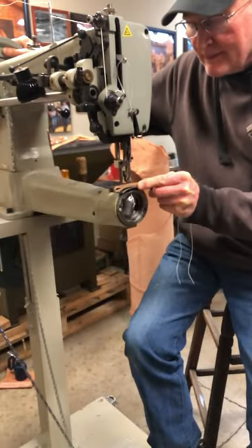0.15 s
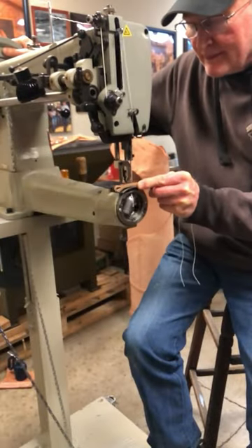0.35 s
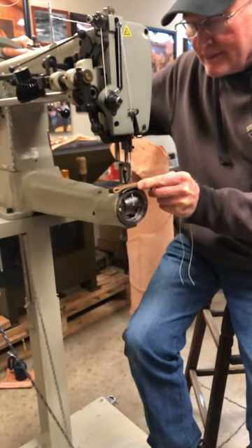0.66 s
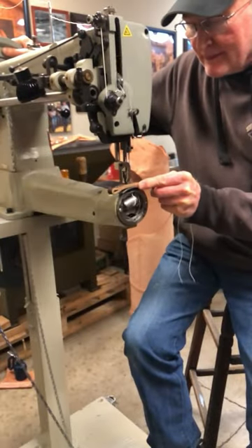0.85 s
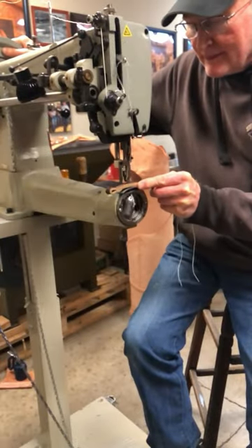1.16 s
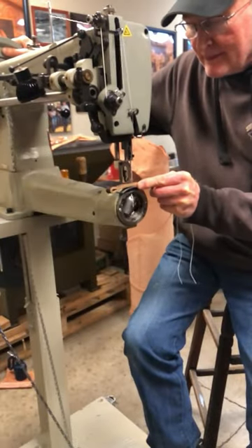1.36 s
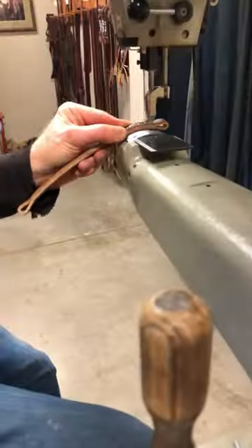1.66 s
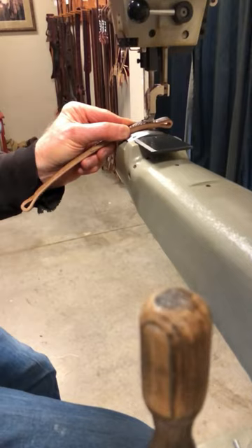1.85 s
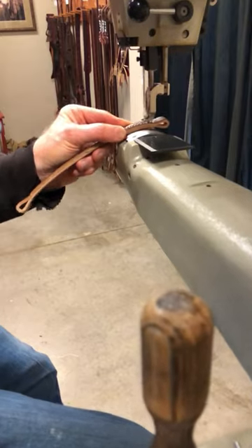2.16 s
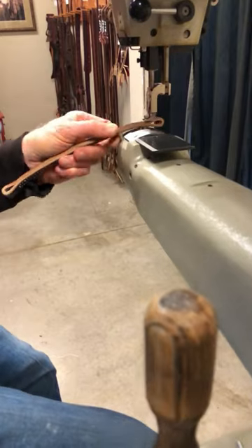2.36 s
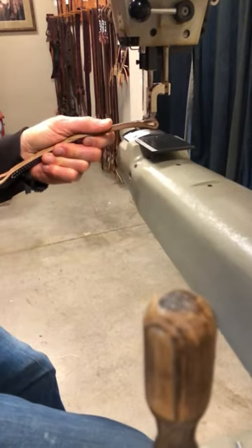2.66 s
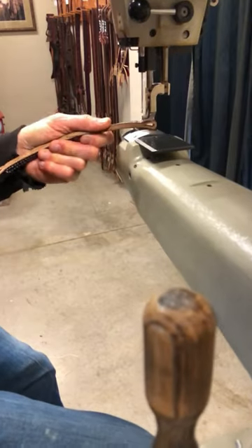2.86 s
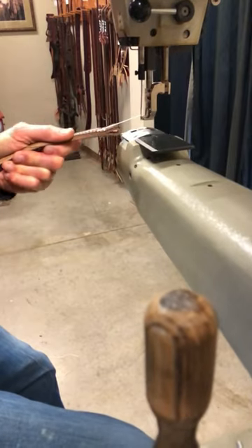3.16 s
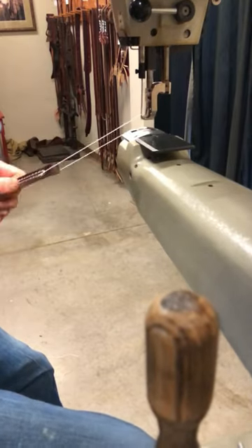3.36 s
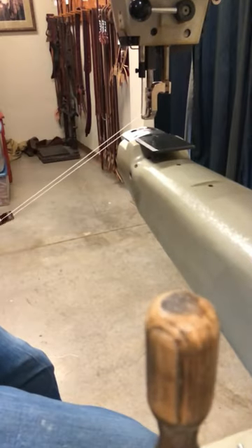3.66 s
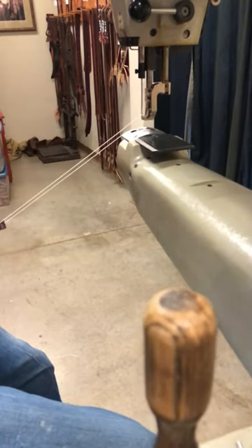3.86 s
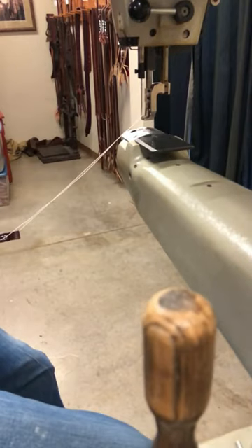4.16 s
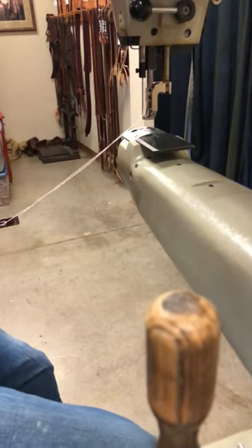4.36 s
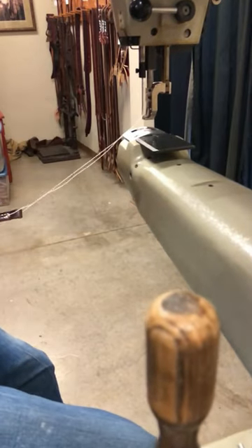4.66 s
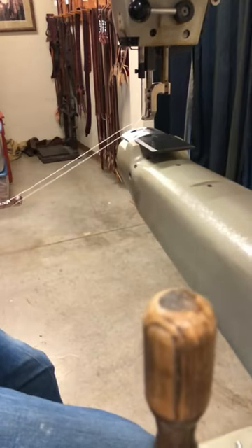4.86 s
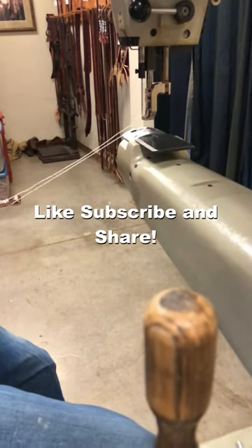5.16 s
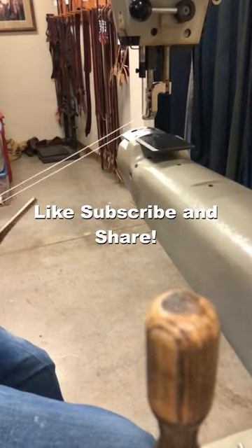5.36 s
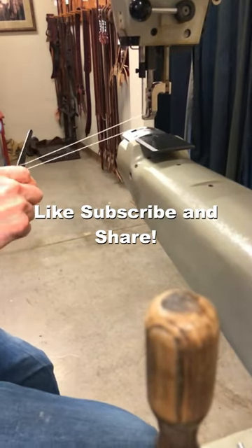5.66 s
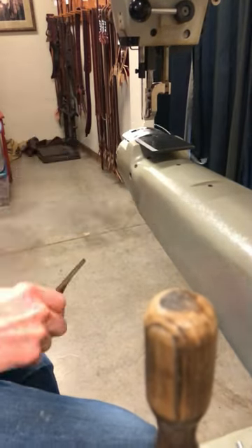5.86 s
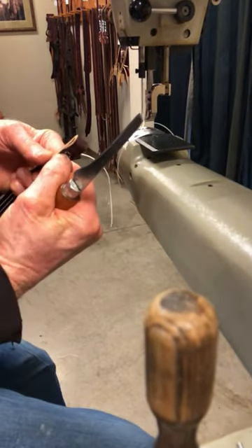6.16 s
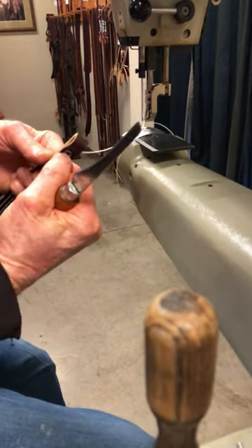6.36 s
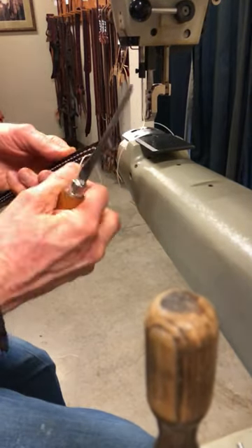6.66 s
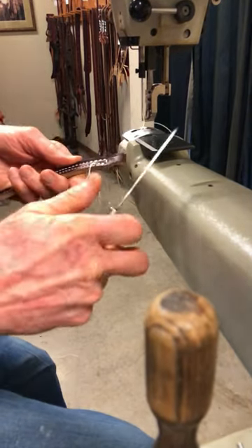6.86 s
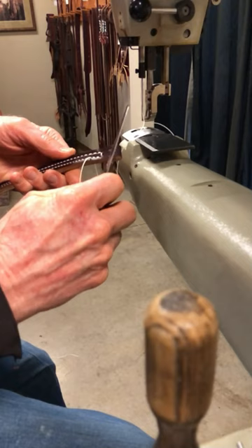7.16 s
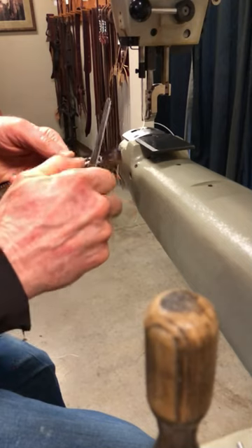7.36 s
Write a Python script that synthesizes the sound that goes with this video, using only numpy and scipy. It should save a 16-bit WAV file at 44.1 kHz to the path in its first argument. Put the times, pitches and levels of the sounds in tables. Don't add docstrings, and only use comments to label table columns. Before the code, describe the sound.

Loud geared whine with rhythmic metallic clacking halts dead; afterwards leather is handled, waxed thread rasps out, and a blade softly snips ends.

```python
import sys
import numpy as np
from scipy import signal
from scipy.fft import rfft, irfft
from scipy.io import wavfile

SR = 44100
rng = np.random.default_rng(int(sys.argv[2]) if len(sys.argv) > 2 else 0)


def nominal_scale(level):
    x = np.asarray(level, float) / 20
    return 10 ** x


def digitize_waveform(pressure):
    field = np.atleast_2d(pressure).T
    bounded = np.clip(field, -1, 1)
    quanta = np.round(bounded * 32767).astype(np.int16)
    wavfile.write(sys.argv[1], SR, quanta)


N = 331632

# (multiple [1], level [dB])
MESH_HARMONICS = [(1, -24), (2, -23.5), (3, 0.5), (4, -44), (5, -11.5), (6, 2), (7, 4.5), (8, -4), (9, 4),
                  (10, 4.5), (11, 0.5), (12, -1.5), (13, -12), (14, -2.5), (15, -13.5), (16, -10.5),
                  (17, -8.5)]
HOUSING_SLOPES = {3: .4, 6: .9, 9: -1.0, 10: 1.0, 11: -.2}
# (time [s], frequency [Hz])
MESH_SPEED = [(0, 379.8), (.09, 379.2), (.126, 374.3), (.16, 378.8), (.28, 380), (.41, 377.6), (.45, 372.2),
              (.56, 376), (.62, 378.2), (.75, 377), (.79, 371.8), (.88, 374.5), (.93, 377.4), (1.06, 379.4),
              (1.125, 375.3), (1.17, 378), (1.39, 377.3), (1.44, 372.2), (1.53, 373.8)]
# (time [s], level [dB])
TOOTH_BEARING = [(0, 2.5), (.1, -1.5), (.22, 3), (.32, -0.5), (.41, -1.5), (.46, 1.5), (.6, 2), (.72, -1),
                 (.82, 1.5), (1.0, 2), (1.2, 1), (1.37, 0), (1.46, -0.5), (1.55, 3.5)]
# (frequency [Hz], density [dB])
DRIVE_SPECTRUM = [(40, -19), (118, -12.5), (311, -2), (760, -9.5), (1300, -9.5), (1900, -16.5), (2450, -8),
                  (2850, -19), (3350, -6), (3600, -11), (4300, -14.5), (5000, -18), (8500, -15),
                  (10000, -22), (13000, -22.5), (16000, -20)]
# (frequency [Hz], width [Hz], level [dB])
FRAME_MODES = [(55.7, 9.1, -65.5), (125.5, 7.7, -49.5), (238, 40, -52), (312.8, 7.4, -53.5),
               (1255, 150, -72.5)]
# (time [s], strength [dB])
STITCHES = [(0.0284, -1), (0.363, 2.5), (0.6957, 0.5), (1.03, 0), (1.3655, 1)]
# (time in stitch [s], peak over 5 kHz [dB], 1.5-5 kHz [dB], under 1.5 kHz [dB], ring [Hz])
STITCH_CONTACTS = [(-.001, -21, -7, -15.5, 6200), (.0025, -19.5, -5.5, -14.5, 6530),
                   (.1805, -24.5, -4, -12.5, 6150), (.1845, -24, -4.5, -14, 9040),
                   (.1885, -25.5, -8, -8, 6500), (.2915, -17, -4, -16, 7360),
                   (.295, -25.5, -3.5, -19, 4460)]
# columns as the contacts, but time from the start [s]
LOCKING_CONTACT = (1.5525, -33, 8, -5, 3600)
# (time [s], peak over 5 kHz [dB], ring [Hz])
TOUCHES = [(0.0237, -30, 8100), (0.0307, -22.5, 6200), (0.0318, -23, 6300), (0.0361, -27, 6200),
           (0.1317, -19.5, 12400), (0.1761, -33.5, 5900), (0.212, -27.0, 6400), (0.3154, -31.5, 7100),
           (0.318, -22, 11600), (0.3208, -25, 6800), (0.3537, -31.0, 13100), (0.3632, -22, 7200),
           (0.3651, -24.5, 13700), (0.3677, -30.5, 6400), (0.4263, -35, 10000), (0.4664, -20, 12300),
           (0.543, -24, 5800), (0.546, -25.5, 6400), (0.5499, -26, 6400), (0.6349, -33, 7800),
           (0.6494, -29.5, 7800), (0.6534, -19, 6100), (0.6598, -31.0, 7600), (0.6646, -33, 7700),
           (0.691, -31.5, 12500), (0.6978, -22, 7300), (0.6998, -22.5, 6200), (0.7018, -27, 7400),
           (0.7037, -30, 6200), (0.7598, -33, 8300), (0.8, -19.5, 12300), (0.8634, -33.0, 6300),
           (0.8747, -24, 5800), (0.8777, -24, 6400), (0.8815, -26, 7800), (0.9876, -21.5, 6400),
           (0.9892, -24, 10100), (0.9915, -28, 10800), (1.0238, -29.0, 8000), (1.0312, -24, 7300),
           (1.0345, -29.5, 7200), (1.04, -33, 8300), (1.0926, -32, 5800), (1.1331, -17.5, 12400),
           (1.1777, -34, 7700), (1.209, -24, 5800), (1.2117, -29.5, 14500), (1.2147, -28, 13500),
           (1.218, -32, 8700), (1.3209, -19, 11700), (1.3236, -26.0, 7700), (1.3581, -32, 12600),
           (1.3638, -28, 6500), (1.3654, -22, 6100), (1.3678, -22, 12800), (1.4693, -18.5, 12300)]
# (time in stitch [s], frequency [Hz], level [dB], T60 [s])
STITCH_RINGS = [(.001, 3610, -31, .025), (.002, 1300, -38, .03), (.104, 2500, -35, .04),
                (.181, 1400, -36, .04), (.292, 3050, -36, .025), (.2925, 4520, -33, .025),
                (.2915, 5200, -36, .015), (.003, 4100, -37, .02)]
# (time [s], frequency [Hz], level [dB], T60 [s])
STRUCK_RINGS = [(1.575, 1180, -50, .4), (1.555, 500, -38, .04), (1.57, 290, -42, .1), (1.69, 280, -44, .08),
                (1.842, 2670, -32, 0.11), (1.859, 2670, -36, 0.14), (1.756, 3450, -50, .06),
                (1.787, 3400, -55, .12), (1.953, 1500, -44, .03), (1.966, 300, -41, 0.16),
                (2.09, 260, -47, 0.12), (2.214, 3100, -56, .04), (2.241, 2200, -47, .04),
                (2.368, 1550, -50, .05), (2.946, 3150, -56, .05), (2.364, 490, -46, .07),
                (2.385, 300, -50, .1), (3.022, 700, -49, .05), (3.031, 450, -47, .07),
                (3.118, 1100, -54, .05), (2.938, 880, -52, .05), (2.805, 750, -58, .08),
                (2.155, 800, -54, .12), (3.023, 2150, -48, .03), (4.59, 500, -56, 0.06),
                (4.682, 1650, -55, .03), (4.692, 3300, -60, .03), (4.695, 1650, -58, .03),
                (4.732, 3000, -44, .02), (4.786, 3900, -56, .02), (4.934, 3400, -61, .03),
                (4.733, 1580, -40, 0.025), (4.785, 1650, -46, .035), (4.803, 1680, -55, .06),
                (4.733, 1000, -42, .07), (4.924, 1480, -49, .025), (3.247, 1750, -52, .06),
                (5.802, 700, -44, 0.035), (5.812, 480, -36, 0.042), (7.047, 5800, -50, .02),
                (7.0475, 4020, -41, .018), (6.5836, 1900, -52, .012), (6.978, 4100, -45, .015),
                (3.718, 2170, -50, .05), (3.756, 2180, -53, .05), (3.594, 2140, -47, .03),
                (3.208, 2180, -49, .06), (4.143, 200, -56, .1), (3.987, 400, -52, .06)]
# (time [s], peak over 5 kHz [dB], body [dB], ring [Hz])
ARM_KNOCKS = [(1.6588, -52.5, 3.5, 1130), (1.8237, -36.5, -4.5, 1180), (1.8412, -18.5, -15, 4720),
              (1.8585, -19.5, -10, 1530), (1.9505, -38, 0, 5470), (1.975, -46, 5, 1120),
              (1.995, -53, 6, 1300), (2.0726, -32.5, 0, 1170), (2.127, -43.5, 6, 1250),
              (2.2328, -56, 11, 1210), (2.2414, -58.5, 6, 795), (2.447, -57, -6, 3030),
              (2.78, -61, 1.5, 2200), (2.363, -45, 2, 1390), (2.5074, -56, -5, 830),
              (2.5326, -53, -8, 2070), (2.6174, -52, -1.5, 676), (2.7854, -65, 5, 710),
              (2.8406, -59.5, 8.5, 855), (2.9364, -53, 1.5, 870), (3.0206, -55.5, 11, 520),
              (3.985, -52, 4.5, 1160), (3.1172, -59, 4, 1160)]
# (time [s], peak over 5 kHz [dB], body [dB], ring [Hz])
THREAD_JERKS = [(3.1677, -64, -5, 1170), (3.2076, -54, 4, 2070), (3.2465, -60, 11, 1700),
                (3.3368, -43, 0, 2020), (3.3782, -42.5, -0.5, 1110), (3.3992, -61, 10, 1200),
                (3.5937, -57, 5, 2080), (3.688, -72, 0, 1070), (3.7164, -74, 2, 2050),
                (3.7244, -67, 8, 2100), (3.7533, -69, 8, 2110), (3.7653, -64, 8, 2080),
                (3.8337, -64, 8.5, 2040), (3.8756, -74, -6, 1200), (4.111, -71, -6, 1800)]
# (time [s], peak over 5 kHz [dB], body [dB], ring [Hz])
BENCH_KNOCKS = [(4.497, -62, -3, 1780), (4.5024, -59.5, -4.5, 875), (4.6814, -44, -16.5, 810),
                (4.7309, -21.5, -21, 990), (4.7854, -50, 0.5, 1680), (4.9236, -67, 6, 1490),
                (5.087, -54.5, -4, 3980), (5.3084, -61, -0.5, 900), (5.4124, -50, -20, 725),
                (5.7941, -34, -24, 8050), (5.8064, -23, -18, 690), (6.491, -63, -1, 880),
                (6.628, -54, -8, 7250), (7.3696, -47, -27, 1350)]
# (time [s], peak over 5 kHz [dB], body [dB], ring [Hz])
SCUFFS = [(1.7554, -41.5, -12, 3350), (1.862, -28.5, -17, 2580), (3.1624, -43.5, -13, 1140),
          (3.984, -35, -15, 3340), (4.143, -64, 5, 1200), (4.588, -45, -20, 960)]
# (time [s], peak over 5 kHz [dB], body [dB], ring [Hz])
HANDLING_TICKS = [(1.7396, -54, 6, 1840), (1.775, -43, -10, 3400), (1.791, -50, -9, 3400),
                  (1.808, -46, 5, 1390), (1.831, -27, -16, 2700), (1.9505, -27.5, -5.5, 5540),
                  (1.859, -22, -6, 4500), (6.9725, -57, -4, 4000), (2.157, -45, -14, 9400),
                  (2.176, -47, -3.5, 2400), (2.218, -57, -2, 3200), (2.382, -52, -3, 1500),
                  (2.406, -54, -1, 900), (2.3935, -35.5, -11.5, 2250), (2.585, -40.5, -13.5, 3300),
                  (2.6595, -42, -8.5, 4000), (2.7014, -43, -15, 1590), (2.8292, -41.5, -15, 1200),
                  (3.3068, -50, 3, 1190), (3.4273, -44, 6.5, 2000), (3.4694, -58, 5, 1400),
                  (3.5055, -38, 4, 1630), (3.6073, -49.5, 5.5, 1830), (3.936, -56, 4.5, 1340),
                  (4.3817, -53, -7, 4260), (4.8424, -39, -27, 8840), (4.881, -36, -25, 12000),
                  (5.4704, -53, -4, 1560), (5.779, -44, -21, 7040), (6.075, -63, -9, 4500),
                  (6.387, -55, -9, 7900), (5.7974, -30.5, -5.5, 1950), (6.3108, -34.5, -16, 1270),
                  (6.397, -60, -9, 8770), (6.347, -56, -6, 1230), (6.374, -52, -5, 1180),
                  (6.4044, -50.5, -14, 1260)]
# (time [s], level [dB])
FIRST_PULL = [(3.148, -72), (3.218, -54), (3.302, -57.5), (3.34, -51), (3.45, -50.5), (3.53, -49),
              (3.6, -56), (3.65, -64)]
# (time [s], level [dB])
SECOND_PULL = [(3.712, -71), (3.75, -68), (3.83, -55), (3.852, -64)]
# (frequency [Hz], width [Hz], level [dB])
GUIDE_MODES = [(425, 59, 0), (738, 97, -4), (1180, 46, -1), (1410, 30, -5), (2170, 130, -2),
               (2420, 41, -10), (3730, 220, -9), (4590, 75, -15), (5300, 170, -11)]
# (time [s], peak over 5 kHz [dB], 3-5 kHz [dB], ring [Hz])
BLADE_CLICKS = [(6.583, -32.5, -5.5, 8550), (6.9775, -23.5, -6.5, 6600), (7.0478, -39.5, -10, 8400),
                (7.234, -46.5, -1, 5500)]
# (time [s], length [s], first frequency [Hz], last frequency [Hz], level [dB])
SQUEAKS = [(1.795, 0.12, 590, 598, -40), (3.45, 0.087, 430, 410, -53), (3.588, 0.032, 2150, 1900, -49.5),
           (3.328, .022, 2150, 2050, -53), (3.712, .026, 2170, 2170, -60), (3.21, .055, 2200, 2180, -59),
           (4.74, .045, 1000, 950, -59), (4.147, 0.016, 2150, 1800, -46), (4.152, 0.012, 2950, 2830, -52),
           (4.68, 0.093, 810, 900, -63), (4.76, .07, 8200, 8000, -66), (4.79, 0.045, 1100, 1000, -57),
           (4.835, .075, 1880, 1870, -66), (4.925, .04, 1890, 1890, -68), (5.005, .035, 1890, 1900, -69)]
# (time [s], length [s], low edge [Hz], high edge [Hz], level [dB])
SWISHES = [(2, 0.063, 2980, 4200, -60), (2.5, 0.1, 6000, 16000, -70), (4.818, 0.11, 5660, 17000, -57.5),
           (5.086, 0.066, 5800, 13000, -66.5), (7, 0.029, 5200, 8600, -63), (6.606, 0.14, 4300, 17000, -71),
           (6.49, 0.032, 1400, 4400, -68.5), (4.586, 0.028, 2900, 6700, -61), (2.7, .05, 5000, 5600, -70),
           (6.972, 0.072, 3300, 4600, -68), (7.046, 0.055, 3700, 4400, -73), (3.302, 0.29, 4840, 5700, -81),
           (7.156, 0.074, 3000, 15300, -72.5)]
# (time [s], fall time [s], dull rub [dB], rustle re rub [dB])
HAND_MOVES = [(1.559, 0.032, -40, -6.5), (1.85, 0.074, -50.5, -7), (1.971, 0.05, -46, -23),
              (2.3, 0.18, -57, -8), (2.97, 0.16, -61.5, -20), (3.45, 0.2, -53.5, -15),
              (3.78, 0.021, -57.5, -25), (4.18, 0.098, -62.5, -7), (4.78, 0.16, -64.5, 0.5),
              (5.21, 0.056, -65, 0), (5.46, 0.14, -67, -3), (5.83, 0.023, -50.5, -11)]
# (frequency [Hz], density [dB])
RUB_SPECTRUM = [(88, -7.5), (150, -7), (384, -4), (522, -3.5), (1300, -10), (1400, -9), (2660, -20.5),
                (5000, -24), (6500, -34), (11000, -120)]
# (frequency [Hz], density [dB])
RUSTLE_SPECTRUM = [(1060, -55), (1800, 1), (2120, -5), (7490, -8), (9250, -11.5), (12700, -14),
                   (13400, -16), (16000, -8.5)]
# (frequency [Hz], density [dB])
SHOP_SPECTRUM = [(15, -40), (25, -18.5), (68, 1), (108, 4.5), (301, -8), (489, -13), (659, -19),
                 (1040, -21.5), (1230, -25.5), (2160, -30), (5570, -27.5), (14800, -32), (16000, -35.5)]

WHINE_DB, RUNNING_DB = -39, -44.5
PIERCE_WHINE_DB, PIERCE_RUNNING_DB = 2, -1
PIERCE_S, SAG_S = 0.092, 0.039
STOP_S, BRAKE_DB_PER_S = 1.518, 480
COAST_DB, COAST_S = -10, 0.07
CLACK_CHATTER_S, SNAP_CHATTER_S, PLAY_DB = 0.011, 0.0028, 1.0
TOUCH_DB, TOUCH_MID_DB, TOUCH_LOW_DB = 4.5, -9.5, -24
LEAN_DB_PER_OCTAVE, LEAN_TOP_DB = 8.0, 6.0
KNIFE_LOW_DB, KNIFE_CHATTER_S = -32, 0.0041
STEADY_UNDER_HZ, STEADY_DB, FLUTTER_DB = 700, -0.5, 4
WAVER = 0.005
STILL_RUB_DB, STILL_RUSTLE_DB, HANDS_FROM_S = -79.5, -83, 1.55
SHOP_DB, SHOP_T60_S, SHOP_WET_DB = -67, 0.17, -10.5


def machine():
    (mesh_hz,), _ = in_time(MESH_SPEED)
    (bearing_db,), _ = in_time(TOOTH_BEARING)
    load = needle_load()
    braked = np.maximum(np.arange(N) / SR - STOP_S, 0)
    brake_db = -BRAKE_DB_PER_S * braked
    whine_db = WHINE_DB + bearing_db + PIERCE_WHINE_DB * load + brake_db
    coast_db = np.maximum(brake_db, COAST_DB - 120 * braked)
    running_db = RUNNING_DB + PIERCE_RUNNING_DB * load + coast_db
    fade_db = -BRAKE_DB_PER_S * np.maximum(braked - COAST_S, 0)

    mesh_hz = mesh_hz + 0.45 * drift(18) + 0.2 * drift(70)
    phase = 2 * np.pi * np.cumsum(mesh_hz) / SR
    fast_hz = mesh_hz - 377
    harmonics = np.zeros(N)
    for multiple, db in MESH_HARMONICS:
        play_db = 1.0 * drift(12) + 1.8 * drift(50)
        housing_db = HOUSING_SLOPES.get(multiple, 0) * fast_hz
        tone = np.sin(multiple * phase + rng.uniform(0, 7.93))
        harmonics += nominal_scale(db + play_db + housing_db) * tone
    alternate_teeth = 1 + 0.047 * np.cos(phase / 2)
    whine = nominal_scale(whine_db - 10.5) * harmonics * alternate_teeth

    running = nominal_scale(running_db + 5.5) * coloured(DRIVE_SPECTRUM, patchy_db=1.2, grit_db=1.6)
    shake = rng.standard_normal(N)
    frame = sum(nominal_scale(db) * rms_one(resonance(shake, hz, width)) for hz, width, db in FRAME_MODES)
    return nominal_scale(fade_db) * (whine + running + nominal_scale(brake_db) * frame)


def needle_load():
    t = np.arange(N) / SR
    return sum(np.exp(-((t - start - PIERCE_S) / SAG_S) ** 2) for start, _ in STITCHES)


def stitch_clacks():
    clacks = [(*LOCKING_CONTACT, CLACK_CHATTER_S)]
    for start, strength_db in STITCHES:
        for after, db, mid_db, low_db, hz in STITCH_CONTACTS:
            if start + after < STOP_S:
                played_db = db + strength_db + PLAY_DB * rng.standard_normal()
                clacks.append((start + after, played_db, mid_db, low_db, hz, CLACK_CHATTER_S))
    return blows(clacks, rise_s=0.0004, crack_db=3, ring_db=-14, ring_q=14, body_stretch=1.19,
                 mid_from_hz=2200, grit_db=3.5)


def hook_snaps():
    touches = [(s, db + TOUCH_DB, TOUCH_MID_DB, TOUCH_LOW_DB, hz, SNAP_CHATTER_S) for s, db, hz in TOUCHES]
    return blows(touches, rise_s=0.00012, crack_db=8, ring_db=-6, ring_q=6, body_stretch=1.3, grit_db=1)


def metal_rings():
    out, t = np.zeros(N + SR), np.arange(SR // 2) / SR
    rings = list(STRUCK_RINGS)
    for start, _ in STITCHES:
        rings += [(start + s, *ring) for s, *ring in STITCH_RINGS if start + s < STOP_S]
    for s, hz, db, t60 in rings:
        at = round(s * SR)
        envelope = (1 - np.exp(-t / 0.00016)) * nominal_scale(db - 60 * t / t60)
        out[at:at + len(t)] += envelope * np.sin(2 * np.pi * hz * t)
    return out[:N]


def knocks():
    rows = handled(ARM_KNOCKS, 0.013) + handled(THREAD_JERKS, 0.011)
    rows += handled(BENCH_KNOCKS, 0.0069) + handled(SCUFFS, 0.056)
    return blows(rows, rise_s=0.0005, crack_db=4, ring_db=-1, ring_q=9, body_stretch=1.2)


def handling_ticks():
    return blows(handled(HANDLING_TICKS, 0.0044), rise_s=0.0003, crack_db=7, ring_db=-7, ring_q=10,
                 body_stretch=1.4, grit_db=2)


def thread():
    pulls = [in_time(rows) for rows in (FIRST_PULL, SECOND_PULL)]
    slips = rng.standard_normal(N) * nominal_scale(1.8 * drift(60) + 2.2 * drift(170))
    body = np.zeros(N)
    for hz, width, db in GUIDE_MODES:
        body += nominal_scale(db + 1.8 * drift(21)) * rms_one(resonance(slips, hz, width))
    return sum(nominal_scale(db + fade_db - 2.5) for (db,), fade_db in pulls) * rms_one(body)


def knife():
    snips = [(s, db, mid_db, KNIFE_LOW_DB, hz, KNIFE_CHATTER_S) for s, db, mid_db, hz in BLADE_CLICKS]
    return blows(snips, rise_s=0.00012, crack_db=12, ring_db=-5, ring_q=10, body_stretch=1.2,
                 mid_from_hz=3500)


def squeaks():
    out, flutter, waver = np.zeros(N), drift(90), drift(150)
    for s, length, first_hz, last_hz, db in SQUEAKS:
        rough_db = STEADY_DB if first_hz < STEADY_UNDER_HZ else FLUTTER_DB
        at, part = round(s * SR), np.linspace(0, 1, round(length * SR))
        span = slice(at, at + len(part))
        glide_hz = first_hz + (last_hz - first_hz) * part
        hz = glide_hz * (1 + WAVER * max(rough_db, 0) * waver[span])
        tone = np.sin(2 * np.pi * np.cumsum(hz) / SR)
        swell = np.sin(np.pi * part ** 1.1) ** 0.66
        out[span] += nominal_scale(db + rough_db * flutter[span]) * swell * tone
    return out


def swishes():
    out = np.zeros(N)
    for s, length, low_hz, high_hz, db in SWISHES:
        at, part = round(s * SR), np.linspace(0, 1, round(length * SR))
        grit = rng.standard_normal(18000) * nominal_scale(2.5 * rng.standard_normal(360).repeat(50))
        hiss = rms_one(band(grit, low_hz, high_hz))[:len(part)]
        out[at:at + len(part)] += nominal_scale(db) * np.sin(np.pi * part) * hiss
    return out


def hands():
    t = np.arange(N) / SR
    rub_level, rustle_level = nominal_scale(STILL_RUB_DB), nominal_scale(STILL_RUSTLE_DB)
    for s, fall, db, bright_db in HAND_MOVES:
        swell = nominal_scale(db) * np.exp(-abs(t - s) / fall)
        rub_level = rub_level + swell
        rustle_level = rustle_level + nominal_scale(bright_db) * swell
    rub = rub_level * coloured(RUB_SPECTRUM, patchy_db=2.2, grit_db=2.5)
    rustle = rustle_level * coloured(RUSTLE_SPECTRUM, patchy_db=2.5, grit_db=2.5)
    return (t > HANDS_FROM_S) * (rub + rustle)


def workshop(x):
    t = np.arange(round(0.5 * SR)) / SR
    noise = rng.standard_normal(len(t)) * (t > 0.004)
    bright = noise * nominal_scale(-90 * t / SHOP_T60_S)
    dull = 0.85 * band(noise, 150, 5200) * nominal_scale(-60 * t / SHOP_T60_S)
    tail = bright + dull
    return signal.fftconvolve(x, tail / np.sqrt(np.sum(tail ** 2)))[:N]


def room_noise():
    return nominal_scale(SHOP_DB + 2.5) * coloured(SHOP_SPECTRUM, patchy_db=2.5, grit_db=-3.0)


def blows(rows, rise_s, crack_db, ring_db, ring_q, body_stretch, mid_from_hz=1500, grit_db=4.5):
    t = np.arange(round(0.15 * SR)) / SR
    slow = np.array([[1], [body_stretch], [body_stretch ** 2]])
    trains, rings = np.zeros((3, N + len(t))), np.zeros(N + len(t))
    for s, db, mid_db, low_db, hz, chatter in rows:
        at, levels_db = round(s * SR), db + np.array([0, mid_db, low_db])
        decay = nominal_scale(-30 * t / (max(chatter, 0.001) * slow))
        noise = rng.standard_normal((3, len(t))) * decay * (1 - np.exp(-t / rise_s))
        touch = rng.standard_normal(len(t) // 16 + 1).repeat(16)[:len(t)]
        noise *= nominal_scale(grit_db * touch - grit_db / 2)
        noise[:, :2] = nominal_scale(crack_db) * np.array([[1, -2.0], [1, -0.1], [2, 0.25]])
        trains[:, at:at + len(t)] += noise * nominal_scale(levels_db)[:, None]
        own_band = 2 - np.searchsorted([1500, 5000], hz)
        ring = resonance(noise[1], hz, hz / ring_q)
        rings[at:at + len(t)] += nominal_scale(levels_db[own_band] + ring_db) * ring / abs(ring).max()
    high = nominal_scale(-9.5) * band(trains[0], 3600, 13800)
    mid = band(trains[1], mid_from_hz, 5130)
    low = nominal_scale(6.0) * band(trains[2], 420, 2020)
    return (high + mid + low + rings)[:N]


def handled(rows, chatter_s):
    out = []
    for s, db, body_db, hz in rows:
        lean_db = np.clip(LEAN_DB_PER_OCTAVE * np.log2(hz / 1500), -LEAN_TOP_DB, LEAN_TOP_DB)
        out.append((s, db, body_db + lean_db, body_db - lean_db, hz, chatter_s))
    return out


def coloured(spectrum, patchy_db, grit_db):
    hz = np.fft.rfftfreq(N, 1 / SR) + 1
    grains = rng.standard_normal(N) * nominal_scale(grit_db * rng.standard_normal(N // 16 + 1).repeat(16)[:N])
    points = np.array(spectrum)
    shaped = rfft(grains) * nominal_scale(np.interp(np.log(hz), np.log(points[:, 0]), points[:, 1]))
    octave = np.log2(hz / 30)
    out = np.zeros(N)
    for k in range(10):
        part = irfft(shaped * np.clip(1 - abs(octave - k), 0, 1), N)
        out += part * nominal_scale(patchy_db * min(k / 5, 1) * np.clip(drift(12.6), -2, 1.6))
    return rms_one(out)


def drift(rate):
    r = np.exp(-80 * np.pi * rate / SR)
    slow = signal.lfilter([1], [1, -2 * r, r * r], rng.standard_normal(N // 40 + 2002))[2000:]
    return np.interp(np.arange(N) / 40, np.arange(len(slow)), rms_one(slow))


def resonance(x, hz, width):
    r = np.exp(-np.pi * width / SR)
    poles = [1, -2 * r * np.cos(2 * np.pi * hz / SR), r * r]
    return signal.lfilter([(1 - r * r) / 2, 0, (r * r - 1) / 2], poles, x)


def band(x, low_hz, high_hz):
    return signal.sosfilt(signal.butter(2, [low_hz, high_hz], "band", fs=SR, output="sos"), x)


def rms_one(x):
    return x / np.sqrt(np.mean(x ** 2) + 1e-20)


def in_time(rows, fade_db_s=600):
    s, *columns = np.transpose(rows)
    t = np.arange(N) / SR
    outside = np.maximum(s[0] - t, 0) + np.maximum(t - s[-1], 0)
    return [np.interp(t, s, c) for c in columns], -fade_db_s * outside


def scene():
    near = stitch_clacks() + hook_snaps() + knocks() + handling_ticks()
    rings, snips = metal_rings(), knife()
    reverb = nominal_scale(SHOP_WET_DB) * workshop(near + 0.5 * (snips + rings))
    mix = near + rings + snips + reverb + machine() + thread()
    mix += squeaks() + swishes() + hands() + room_noise()
    return np.array([mix, mix])


def top_cut(x):
    return signal.sosfilt(signal.butter(12, 16820, fs=SR, output="sos"), x)


def record(dry):
    thin = signal.sosfilt(signal.butter(2, 42, "high", fs=SR, output="sos"), dry)
    cut = signal.sosfilt(signal.cheby2(20, 55, 15950, fs=SR, output="sos"), thin)
    return top_cut(cut)


dry = scene()
out = record(dry)
digitize_waveform(out)
```